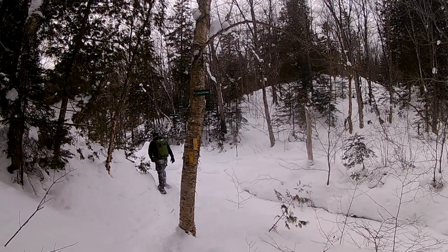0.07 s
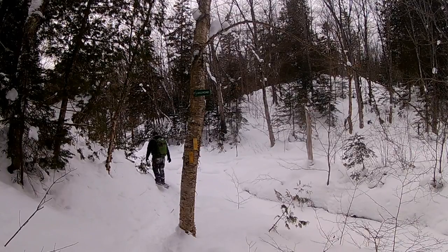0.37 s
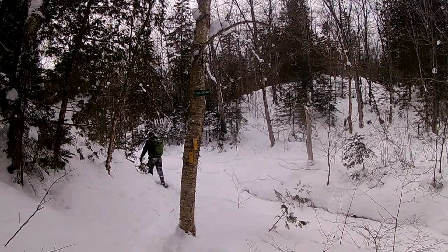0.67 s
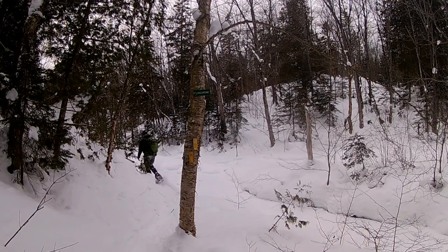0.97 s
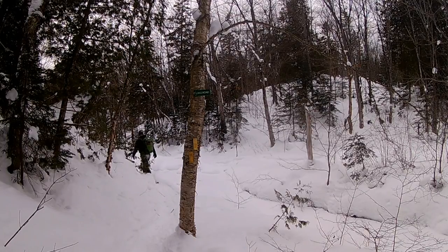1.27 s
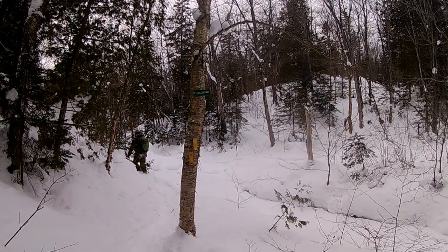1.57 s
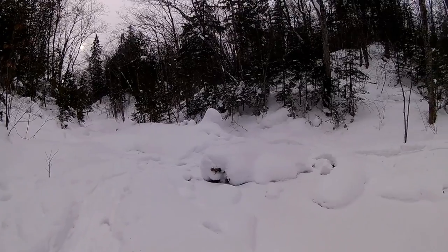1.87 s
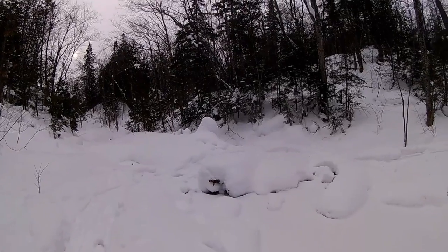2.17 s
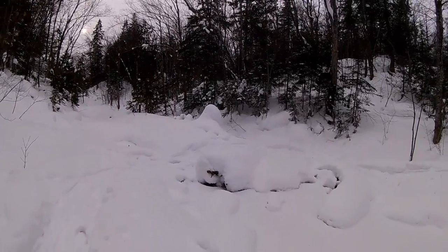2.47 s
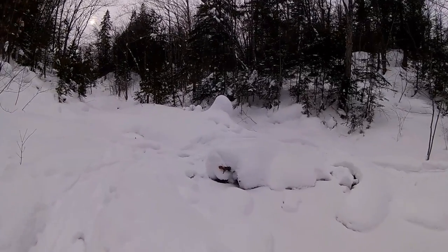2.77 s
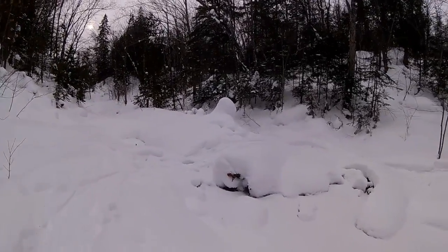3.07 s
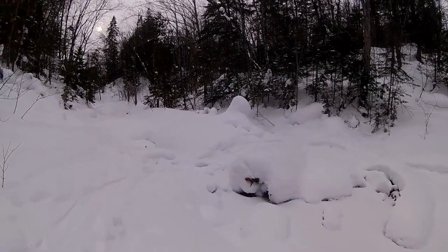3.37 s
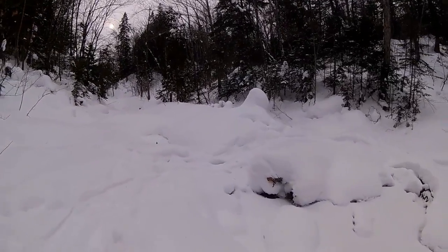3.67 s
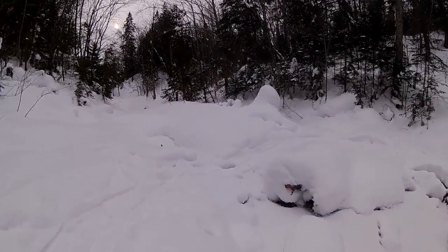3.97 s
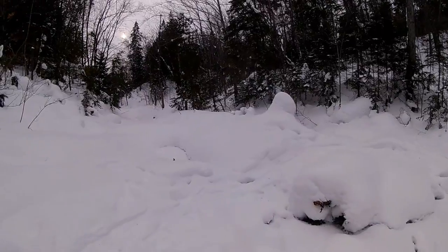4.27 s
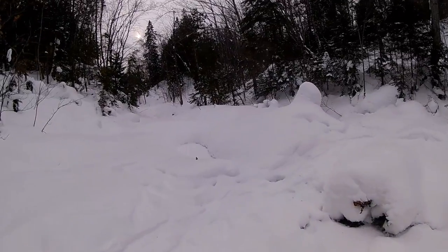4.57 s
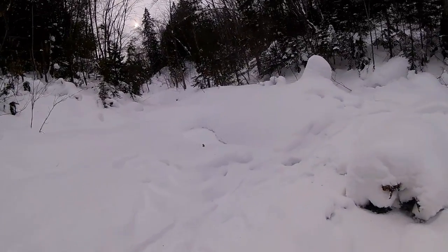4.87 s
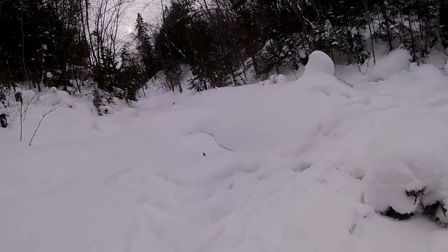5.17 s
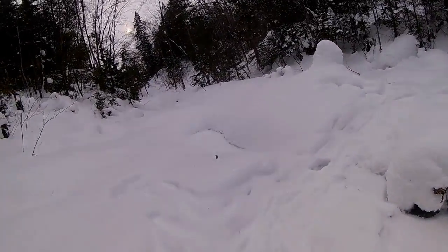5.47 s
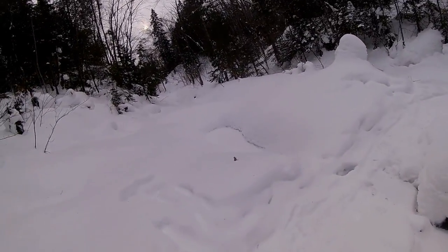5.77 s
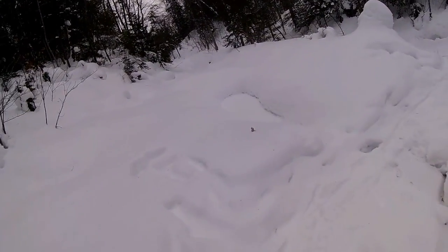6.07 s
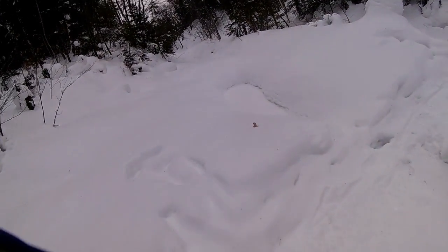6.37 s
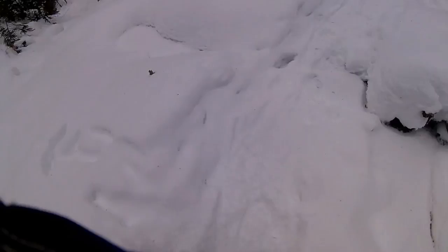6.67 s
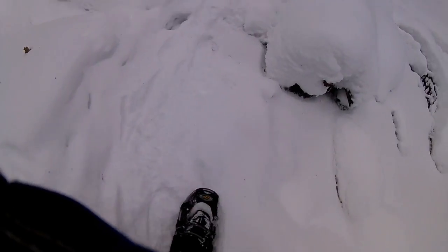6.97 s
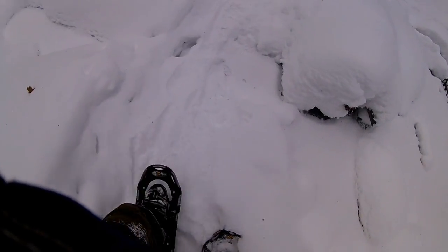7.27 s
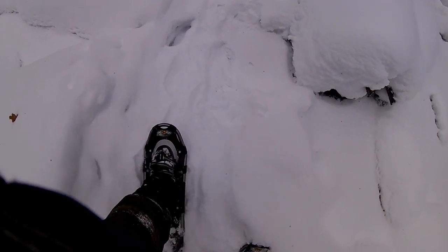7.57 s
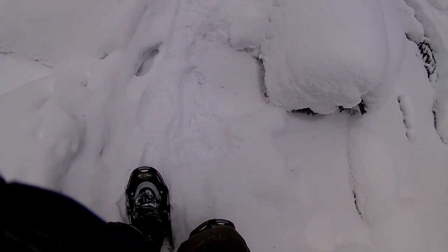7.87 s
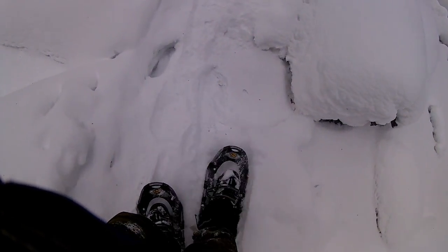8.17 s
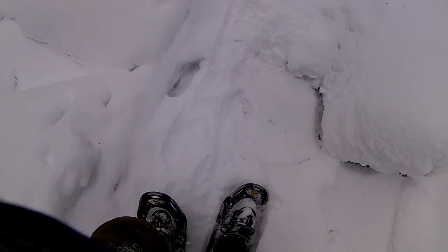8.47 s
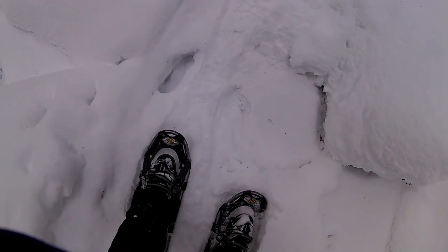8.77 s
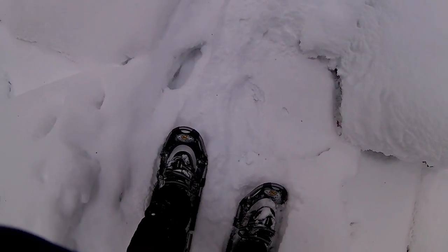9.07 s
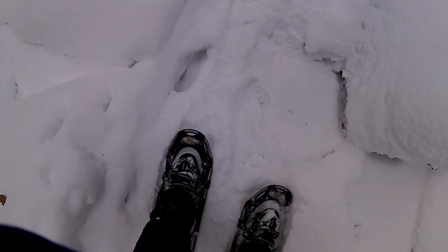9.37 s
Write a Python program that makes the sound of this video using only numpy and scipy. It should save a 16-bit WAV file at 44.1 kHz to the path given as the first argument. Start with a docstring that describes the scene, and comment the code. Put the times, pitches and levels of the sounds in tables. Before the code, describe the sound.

Muffled snowshoe steps in deep snow come close with crunches, squeaks and sharp clacks, then stop beside faintly gurgling water.

```python
"""Snowshoes in deep snow in a quiet forest, heard through a muffled microphone.
First, over faint wind, a walker moves off, each step crushing the snow in a swarm of tiny fractures.
At about 1.5 seconds the sound fades out and comes back. Then the steps come close and pass:
packed snow squeaks, lumps of crust snap, and the frames and bindings clack.
Towards the end water gurgles under the snow, and a few bubbles plop as the walker stops."""
import sys
import numpy as np
from scipy import signal
from scipy.io import wavfile
from scipy.ndimage import uniform_filter1d

SR = 44100
rng = np.random.default_rng(int(sys.argv[2]) if len(sys.argv) > 2 else 0)


def master_out(mix):
    """Clip the mix to full scale and print it as 16-bit PCM to the path in sys.argv[1]."""
    frames = np.transpose(np.atleast_2d(mix))
    ceiling = np.clip(frames, -1, 1)
    pcm = np.round(ceiling * 32767).astype(np.int16)
    wavfile.write(sys.argv[1], SR, pcm)


N = 419832
TIME = np.arange(N) / SR


def amp(db):
    """Decibels to gain."""
    return 10 ** (np.asarray(db) / 20)


def evened(x):
    """Scales to rms 1."""
    return x / np.sqrt(np.mean(x ** 2) + 1e-20)


def curve(rows):
    """Joins the rows by straight lines in time, one curve a column."""
    s, *columns = np.transpose(rows)
    return [np.interp(TIME, s, c) for c in columns]


def add(mix, s, sound):
    """Mixes a sound in at time s."""
    part = mix[max(round(s * SR), 0):][:len(sound)]
    part += sound[:len(part)]


def envelope(x, seconds):
    """Running rms level."""
    size = max(int(seconds * SR), 2)
    return np.sqrt(abs(uniform_filter1d(uniform_filter1d(x ** 2, size), size)) + 1e-20)


def colour(x, points, size=4096):
    """Causal filter with the given (Hz, dB) shape."""
    hz, db = np.transpose(points)
    log_gain = np.log(amp(np.interp(np.log(abs(np.fft.fftfreq(size, 1 / SR)) + 1), np.log(hz), db)))
    taps = np.fft.ifft(np.exp(np.conj(signal.hilbert(log_gain)))).real
    return signal.oaconvolve(x, taps[:size // 2])[:len(x)]


def resonate(x, hz, width):
    """One resonance of gain 1."""
    return signal.lfilter(*signal.iirpeak(hz, hz / min(width, SR / 8), SR), x)


def ring(t, hz, t60):
    """A dying sine."""
    return np.sin(2 * np.pi * hz * t) * np.exp(-np.log(1000) * t / max(t60, 1e-3))


# The tone of wind in the trees. Each row: frequency in Hz, level in dB.
TREE_TONE = [(20, -6), (60, -11), (200, -16), (600, -7.5), (1500, -13), (3000, -16), (12000, -51)]
# The tone of air hitting the microphone. Each row: frequency in Hz, level in dB.
BUFFET_TONE = [(15, 1.5), (35, -2.5), (85, 1.5), (130, -18.5), (300, -42.5)]
# How loud that air is. Each row: time in seconds, level in dB.
BUFFET_LEVEL = [(0, -74), (1.0, -67), (1.6, -82), (2.1, -76.5), (3.0, -64), (3.4, -51), (4.45, -55),
                (5.1, -48), (5.4, -66.5), (7.3, -57), (9.0, -69.5)]


def wind(trees_db=-74.5, swell_db=9.5):
    """Wind swells faintly in the trees and buffets the microphone with a low rumble."""
    rates_hz = np.geomspace(.2, 4, 20)
    swell = evened(sum(np.sin(2 * np.pi * (hz * TIME + rng.random())) / np.sqrt(hz) for hz in rates_hz))
    buffet = amp(curve(BUFFET_LEVEL)[0]) * evened(colour(rng.standard_normal(N), BUFFET_TONE))
    trees = amp(trees_db + swell_db * swell) * evened(colour(rng.standard_normal(N), TREE_TONE))
    return trees + buffet


# Loose snow shuffling between steps. Each row: time in seconds, level in dB.
SHUFFLE = [(0, -58.5), (.65, -64), (1.4, -78.5), (2.1, -64), (2.25, -51.5), (3.2, -51), (3.9, -48.5),
           (4.9, -48.5), (5.5, -54), (6.0, -45), (7.27, -52), (7.9, -44.5), (8.9, -43), (9.05, -70)]
# Steps and light scuffs. Each row: moment the weight is on, then how long the slide before it,
# the crush and the settling last (all in seconds), then level, extra bass and extra treble in dB.
STEPS = [(0.255, .10, 0.034, 0.033, -50.5, -10, -4.5), (0.455, .005, .03, 0.02, -54.5, -15, -7),
         (0.76, 0.067, 0.068, .08, -57, -5, -9.5), (1.72, .005, 0.15, 0.0055, -55.5, -10, -6),
         (2.408, 0.0077, 0.12, 0.19, -40, -6.5, -12), (2.912, 0.087, 0.1, 0.053, -33, -14, -9),
         (3.385, 0.051, 0.08, 0.05, -38, -2, -9.5), (3.525, 0.0069, 0.098, 0.0082, -29.5, -9.5, -7.5),
         (4.101, 0, 0.052, 0.043, -28.5, -11, -6), (4.537, 0, 0.078, 0.16, -25, -18, -2.5),
         (5.149, 0.075, 0.07, 0.053, -26, -9.5, -7.5), (5.45, 0, 0.012, .005, -46, -20, -6),
         (5.749, 0.14, 0.053, 0.087, -27, -12, -5), (6.02, 0.062, 0.013, .005, -38.5, -6, -7.5),
         (6.227, 0.065, 0.045, 0.022, -24.5, -3, -11), (6.363, 0.0034, 0.028, 0.13, -24.5, -8, -6.5),
         (6.8, 0.16, .11, .005, -35, 0.5, -8.5), (6.984, .02, 0.079, 0.072, -24, -7.5, -8.5),
         (7.477, 0.12, 0.023, 0.011, -28.5, -9, -11), (7.594, 0.022, 0.041, 0.12, -29, -10, -5.5),
         (8.243, 0.036, 0.066, 0.14, -26, -3.5, -12), (8.753, 0.079, 0.025, 0.024, -27.5, -6, -7.5)]


def foot_push(attack_s=0.026, ease_s=0.023, release_s=0.091, settled_db=-9.5):
    """The feet load the snow step by step; gives curves of level, bass and treble in dB."""
    power = amp(curve(SHUFFLE)[0]) ** 2
    bass, treble = power * -3.5, power * -6.5  # the tone of the shuffle
    # The snowshoe slides in, the weight comes on, eases, and the snow settles.
    shape_db = [-36, -11, -11, 0, -0.5, -6, settled_db, -36]
    for s, slide, crush, settle, db, bass_db, treble_db in STEPS:
        stages = np.cumsum([0, attack_s, slide, attack_s, crush, ease_s, settle, release_s])
        stages += s - slide - 2 * attack_s
        span = slice(*np.searchsorted(TIME, [stages[0], stages[-1]]))
        force_db = np.interp(TIME[span], stages, shape_db)
        step = amp(db + force_db) ** 2
        power[span] += step
        gentle_db = -np.maximum(force_db, settled_db)
        bass[span] += step * (bass_db + 0.58 * gentle_db)  # a gentle push packs the snow more
        treble[span] += step * (treble_db - 0.19 * gentle_db)  # and cracks it less
    return 10 * np.log10(power), bass / power, treble / power


def fractures(per_s, spread_db, crack_s, ring_db=-12, cycles=1.77, count=96):
    """Ice bonds break at random: brief cracks, most of them small, each ringing at its own pitch."""
    sizes = amp(spread_db * np.minimum(rng.exponential(1, N), 4)) * (rng.random(N) < per_s / SR)
    shape, t = rng.integers(0, count, N), np.arange(SR // 50) / SR
    hz = np.geomspace(200, 2600, count)[:, None]
    age = t * hz / cycles
    rings = 2 * np.sin(2 * np.pi * hz * t) * age * np.exp(1 - 2 * age) * hz / hz.mean()
    bursts = rng.standard_normal((count, len(t))) * np.exp(-t / crack_s)
    cracks = bursts + amp(ring_db) * rings * (1 - t / t[-1])
    out = np.zeros(N + len(t))
    for i in np.flatnonzero(sizes):
        out[i:i + len(t)] += sizes[i] * cracks[shape[i]]
    return out[:N]


# How deep the foot sinks, heard as rumble. Each row: time in seconds, extra rumble in dB.
DEPTH = [(1.0, -1.5), (2.0, -11), (3.3, -3), (4.2, 1), (4.7, -17), (5.7, -3.5), (7.0, -11), (7.7, -10),
         (8.3, -18)]
# The four voices of breaking snow, low to high. Each row: frequency in Hz, level in dB.
RUMBLE = [(12, -20), (25, 0.5), (50, 2.5), (85, -0.5), (130, -19.5), (300, -62.5)]
PACKING = [(40, -27), (80, -10), (128, -0.5), (190, -3.5), (275, -6.5), (345, -12.5), (600, -34)]
CRUNCH = [(150, -22), (270, -12.5), (350, -4), (600, 1.95), (800, -3), (980, -1.5), (1200, -3),
          (1400, -9.5), (2200, -27.5)]
CRISP = [(700, 7), (1150, -24), (1400, 3), (1900, 5.5), (3000, 3), (4500, -0.5), (12000, -33)]
# How fast the snow jerks as it gives way. Each row: rate in Hz, strength in dB.
JERKS = [(24, 5.5), (240, -45.5)]


def footsteps(level_db, bass_db, treble_db, most_per_s=3400, jerk_db=2.12):
    """Snow breaks faster under a harder push; the same fractures rumble, thump, crunch and crackle."""
    per_s = most_per_s * amp(.25 * (level_db - level_db.max()))
    grains = fractures(per_s, spread_db=3.5, crack_s=0.00073, ring_db=-10.5)
    voices = [(RUMBLE, bass_db - 4.5 + curve(DEPTH)[0], .08), (PACKING, bass_db - 6.5, .05),
              (CRUNCH, -4, .025), (CRISP, treble_db + 3, .025)]
    out = np.zeros(N)
    for k, (tone, db, smooth_s) in enumerate(voices):
        voice = (-1) ** k * colour(grains, tone)  # neighbouring voices swing against each other
        out += amp(level_db + db) * voice / envelope(voice, smooth_s)  # the foot sets the loudness
    jerks = evened(colour(rng.standard_normal(N), JERKS))
    return out * amp(jerk_db * jerks)


def crumbs(level_db, per_s=14, middle_hz=947, count=400):
    """Small lumps crumble at random under the foot, louder when it pushes harder."""
    times = np.cumsum(rng.exponential(1, count)) / per_s
    chances = np.clip(rng.standard_normal((count, 2)), -2, 2)
    lumps = []
    for s, (size, pitch) in zip(times, chances):
        if s < TIME[-1]:
            db = np.interp(s, TIME, level_db) - 1 + 3 * size
            lumps.append((s, db, middle_hz * 2 ** (0.47 * pitch), 0.009, -8))  # a row as in CRUST_LUMPS
    return snaps(lumps, width_share=0.37)


# The low notes of the snowshoe's flat deck. Each row: pitch in Hz, level in dB, ring time in seconds.
DECK_NOTES = [(117.8, -9.5, 0.078), (159, -3.5, 0.041), (289, -4, 0.036)]


def deck_thud(t, rise_s=0.0037):
    """The deck on packed snow answers a blow with a short thud that swells a moment after it."""
    return sum(amp(db) * ring(t, hz, t60) for hz, db, t60 in DECK_NOTES) * (1 - np.exp(-t / rise_s))


# Squeaks and groans. Each row: start in seconds, length in seconds, pitch in Hz, level in dB.
SQUEAKS = [(0.308, 0.074, 2200, -52), (4.024, 0.049, 1580, -36.5), (4.468, .038, 1770, -44),
           (4.587, 0.046, 1450, -25), (5.319, 0.034, 1770, -36.5), (5.906, 0.011, 1890, -32),
           (6.228, 0.047, 936, -25), (6.328, .02, 1660, -35.5), (6.574, 0.0099, 468, -27.5),
           (7.083, .035, 119, -30.5), (7.466, .03, 920, -30), (8.478, 0.029, 269, -31.5),
           (8.489, 0.026, 2764, -39), (8.651, 0.044, 1590, -30), (8.644, 0.072, 3560, -36)]


def squeaks(width_share=0.22):
    """Cold snow sticks and slips under the load, so its cracks fall into a rough pitch."""
    out = np.zeros(N)
    for s, length, hz, db in SQUEAKS:
        slips = rng.standard_normal(SR // 10)
        width = max(width_share * hz, 100)
        tone = resonate(resonate(slips, hz, width), hz, width)[-int(length * SR):]
        add(out, s, amp(db) * evened(tone) * signal.windows.tukey(len(tone), .5))
    return out


# Larger lumps of crust giving way. Each row: start in seconds, level in dB, pitch in Hz,
# dying-away time in seconds, extra thud in dB.
CRUST_LUMPS = [(0.735, -55.5, 300, 0.042, 21.5), (0.906, -58.5, 330, 0.019, 18),
               (1.426, -59, 393, 0.012, 6), (2.2, -34.5, 575, 0.0071, -9), (2.253, -37, 770, 0.0077, -20),
               (2.312, -42, 560, 0.0052, 11), (2.595, -31, 507, 0.0066, 3.5),
               (2.804, -31.5, 696, 0.0037, -1), (3.354, -26.5, 1060, .009, -10),
               (3.651, -24.5, 841, 0.0066, 7), (3.776, -31.5, 610, 0.014, 4.5),
               (3.913, -32.5, 1048, .004, 5), (3.935, -36, 800, 0.021, 15), (3.993, -29, 600, 0.0066, -1),
               (4.205, -25.5, 795, 0.0075, -17), (4.801, -30, 450, 0.0057, 19.5),
               (4.93, -35.5, 920, 0.0094, -11), (4.986, -36, 879, 0.0052, 11),
               (5.019, -29.5, 955, 0.0046, 4), (5.053, -24.5, 900, 0.013, 5.5),
               (5.149, -17.5, 1360, .012, -4), (5.572, -35.5, 796, .02, -7), (5.851, -24, 426, 0.004, 10),
               (5.949, -28.5, 700, 0.016, 5), (6.142, -28.5, 528, 0.011, -8), (6.227, -21, 1113, 0.011, -2),
               (6.433, -24, 1025, 0.0052, 7), (6.519, -26, 975, .006, -3), (6.589, -26, 388, 0.0091, 6),
               (6.782, -26, 1000, .011, -8.5), (7.087, -30, 511, 0.052, 17.5), (7.586, -19.5, 780, .011, 5),
               (8.011, -26, 574, 0.0075, 5), (8.109, -29.5, 460, 0.019, 7), (8.141, -27.5, 710, 0.0063, 8),
               (8.595, -31.5, 670, 0.013, 11), (8.687, -22, 1400, 0.0081, 4), (8.935, -36, 482, 0.0085, 17)]


def snaps(lumps, width_share, snap_db=-3, thud_db=-1):
    """A lump of crust collapses in a quick, dying run of cracks, and the deck thuds."""
    out, t = np.zeros(N), np.arange(SR // 10) / SR
    cracks = fractures(per_s=4000, spread_db=1.5, crack_s=0.0011)
    for k, (s, db, hz, decay_s, low_db) in enumerate(lumps):
        own_cracks = cracks[k * len(t) % (N - len(t)):][:len(t)]
        burst = resonate(own_cracks * np.exp(-t / decay_s), hz, width_share * hz)
        burst = evened(burst) * np.sqrt(decay_s / t[-1])
        thud = deck_thud(t * rng.uniform(0.82, 1.304))  # each a little lower or higher
        add(out, s, amp(db) * (amp(snap_db) * burst + amp(thud_db + low_db) * thud))
    return out


# Knocks of frame and binding. Each row: start in seconds, peak level in dB, pitch in Hz,
# ring time in seconds, extra thud in dB.
CLACKS = [(2.1275, -31, 1050, 0.0031, -24), (2.7608, -24, 840, 0.0049, -30),
          (3.227, -3.5, 1490, 0.017, -11.5), (3.4478, -17, 640, 0.019, 1), (3.6945, -24, 1050, 0.0031, -14),
          (4.031, -16.5, 1570, 0.083, -21), (4.3606, -4, 545, 0.0069, -27),
          (4.4191, -7.5, 616, 0.0095, -24), (4.717, -10.5, 680, 0.0069, -12), (4.794, -1, 944, 0.0077, -8),
          (5.212, -8, 790, 0.0028, -10), (6.6676, -6, 1030, 0.0081, -4.5),
          (6.6787, -9, 1045, 0.0048, -13.5), (6.722, -17, 1000, 0.014, 0.5), (7.0297, -12, 1020, 0.015, -8),
          (7.037, -15, 485, 0.018, -25), (7.3952, -19.5, 635, 0.017, -9), (8.2635, -19, 630, 0.0093, -6),
          (8.2873, -14.5, 496, 0.024, -17), (8.3059, -20, 600, 0.018, -23),
          (8.6569, -13.5, 1375, 0.038, -12)]
# The notes in a knock. Each row: multiple of its pitch, level in dB, multiple of its ring time.
FRAME_NOTES = [(.55, -9.5, 1.02), (1.0, 10, 0.12), (1.42, -3.5, 0.67), (2.9, -26, 1.9)]


def clacks(thud_db=3, tick_db=-9, rattle_db=-25, rattle_s=0.016, contact_s=0.00029):
    """A blow cushioned by snow rings the frame; the deck thuds and loose parts rattle briefly."""
    out, t = np.zeros(N), np.arange(SR // 10) / SR
    for s, db, hz, t60, low_db in CLACKS:
        frame = sum((-1) ** i * amp(note_db) * ring(t, hz * multiple, t60 * stretch)
                    for i, (multiple, note_db, stretch) in enumerate(FRAME_NOTES))
        frame *= 1 - np.exp(-(t / contact_s) ** 2)  # snow softens the start
        tick = amp(tick_db) * ring(t, hz=2390, t60=0.0052)
        rattle = evened(resonate(rng.standard_normal(len(t)), hz, hz)) * np.exp(-t / rattle_s)
        thud = amp(thud_db + low_db) * deck_thud(t)
        knock = frame / abs(frame).max() + tick + amp(rattle_db) * rattle + thud
        add(out, s, amp(db) * knock / abs(knock).max())
    return out


# Hollows under the snow. Each row: pitch in Hz, width of the resonance in Hz, level in dB.
HOLLOWS = [(60, 200, -8.5), (153, 85, -5.5), (255, 68, 1), (413, 130, -1), (543, 200, -3.5), (660, 540, -2),
           (1110, 400, -8.5), (1620, 2000, -6)]
# How loud the water is. Each row: time in seconds, level in dB.
BROOK_LEVEL = [(4.0, -85), (6.0, -49), (8.0, -55), (9.2, -47), (9.5, -51)]
# Single bubbles. Each row: start in seconds, pitch in Hz, peak level in dB.
PLOPS = [(8.968, 526, -34), (9.034, 524, -38.5), (9.207, 965, -44.5)]


def brook(splashes_per_s=420, plop_s=0.035):
    """Small splashes ring the hollows under the snow; at the end a few larger bubbles plop."""
    water, t = np.zeros(N), np.arange(SR // 10) / SR
    for hz, width, db in HOLLOWS:
        splashes = fractures(splashes_per_s, spread_db=1.0, crack_s=0.0022)
        water += amp(db) * evened(resonate(resonate(splashes, hz, width), hz, width))
    out = amp(curve(BROOK_LEVEL)[0]) * evened(water)
    for s, hz, db in PLOPS:
        bubble = ring(t, hz, plop_s) * (1 - np.exp(-t / 0.0052))
        add(out, s, amp(db) * bubble / abs(bubble).max())
    return out


def scene():
    """Wind, the walker and the water add up to one channel."""
    level_db, bass_db, treble_db = foot_push()
    lumps = snaps(CRUST_LUMPS, width_share=1.02) + crumbs(level_db)
    walker = footsteps(level_db, bass_db, treble_db) + lumps + clacks() + squeaks()
    return (walker + brook() + wind())[None]


# What the covered microphone lets through. Each row: frequency in Hz, gain in dB.
MUFFLING = [(1700, -3.5), (2000, -7.5), (2300, -12.5), (2700, -14), (2950, -20), (3200, -35), (3450, -34.5),
            (3800, -29), (4150, -53), (4700, -34), (6000, -63), (12000, -57)]
# How fast the hiss and rasp flicker. Each row: rate in Hz, strength in dB.
FLICKER = [(150, 0), (1500, -41)]
# The tones of a thin hiss and a gritty rasp. Each row: frequency in Hz, level in dB.
HISS_TONE = [(2500, -5.5), (3600, -3), (4800, -2.5), (6300, -2), (8500, 1.5), (12000, 0)]
RASP_TONE = [(2800, -26), (3300, -7), (3800, 4), (4300, -12), (4800, -6), (6200, -20), (12000, -34)]
# How loud the rasp is. Each row: time in seconds, level in dB against the whole sound.
RASP_LEVEL = [(.5, -31), (1.2, -37.5), (2.4, -45), (3.1, -41.5), (4.5, -41.5), (5.45, -36), (6.2, -48),
              (8.3, -48), (8.7, -46)]
# The sound fades out and comes back. Each row: time in seconds, gain in dB.
FADE = [(1.44, 0), (1.6, -12), (1.665, -45), (1.7, 0)]


def record(dry, gain_db=6.5, hiss_db=-37, self_noise_db=-99.5, ceiling=.45, top_hz=12200):
    """A covered microphone dulls the sound; hiss and rasp follow its level, and it all fades once."""
    rounded = ceiling * np.tanh(dry[0] / ceiling)  # softens the hardest knocks
    muffled = colour(rounded, MUFFLING)
    flicker = amp(2.2 * evened(colour(rng.standard_normal(N), FLICKER)))
    level = envelope(muffled, seconds=0.024)
    hiss = evened(colour(rng.standard_normal(N), HISS_TONE) * flicker)
    hiss *= amp(hiss_db) * level + amp(self_noise_db)
    rasp = evened(colour(rng.standard_normal(N), RASP_TONE) * flicker)
    rasp *= amp(curve(RASP_LEVEL)[0]) * level
    faded = (muffled + hiss + rasp) * amp(gain_db + curve(FADE)[0])
    low_pass = signal.firwin(1023, top_hz, window=("kaiser", 9), fs=SR)
    return signal.oaconvolve(faded, low_pass, "same")[None]


dry = scene()
out = record(dry)
master_out(out)
```